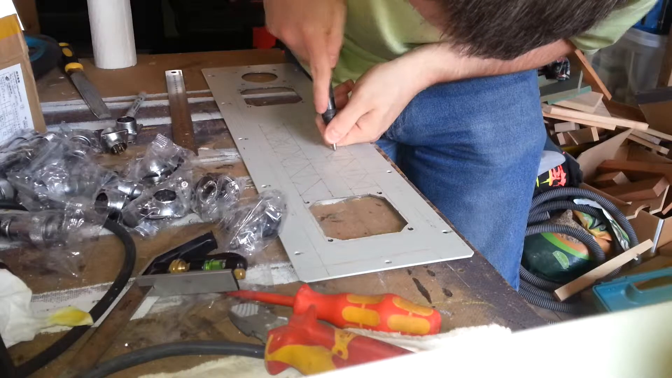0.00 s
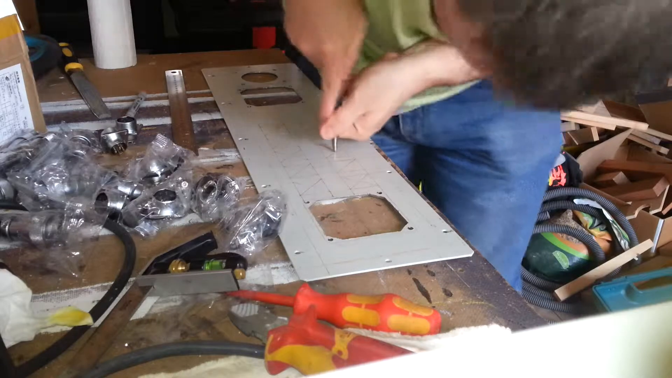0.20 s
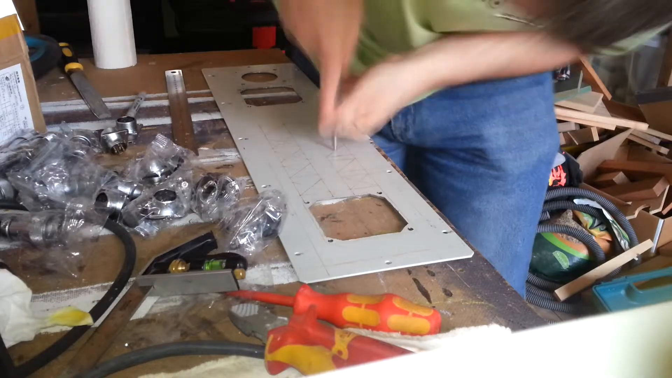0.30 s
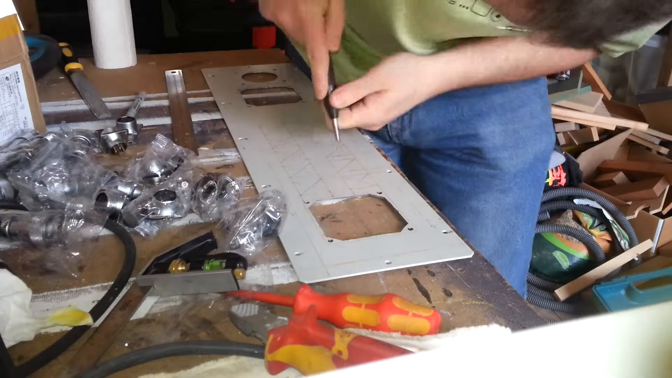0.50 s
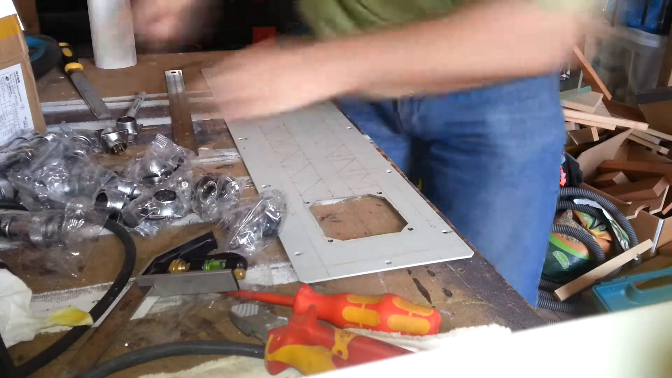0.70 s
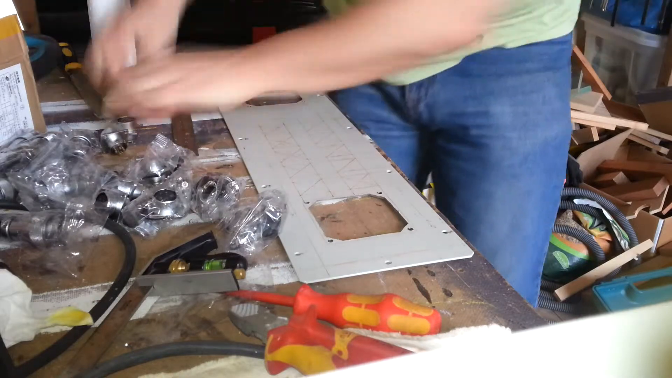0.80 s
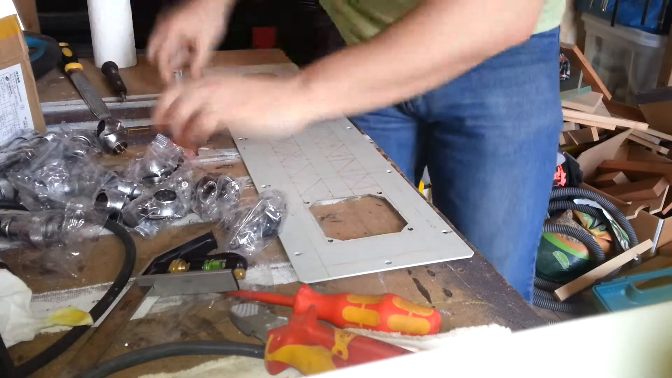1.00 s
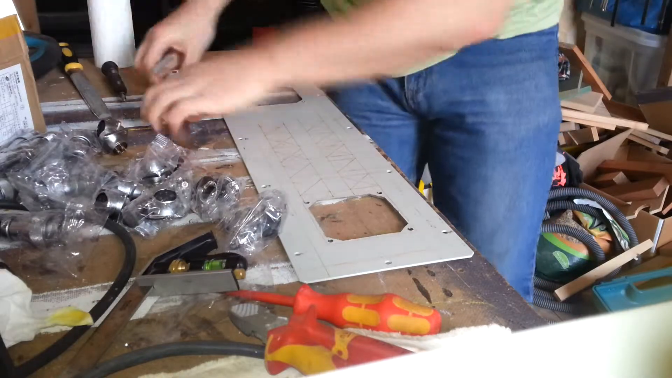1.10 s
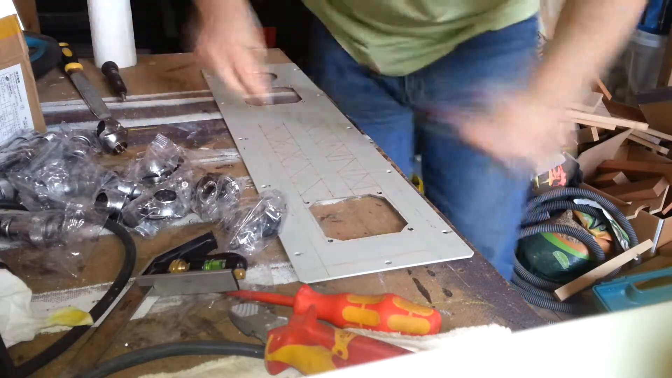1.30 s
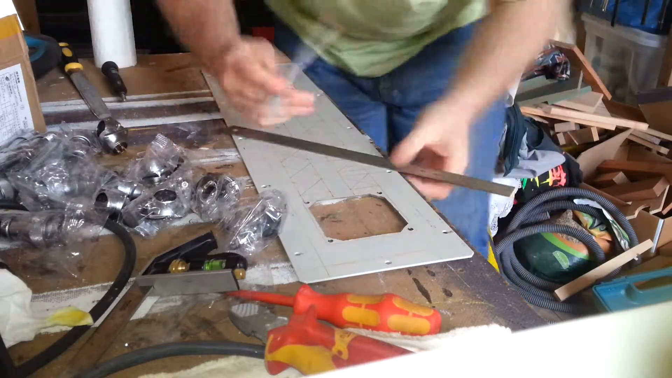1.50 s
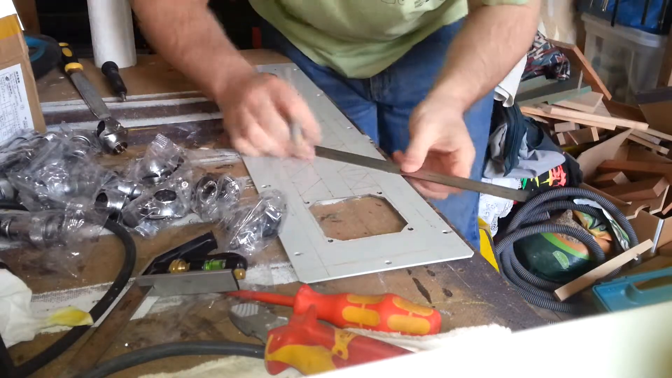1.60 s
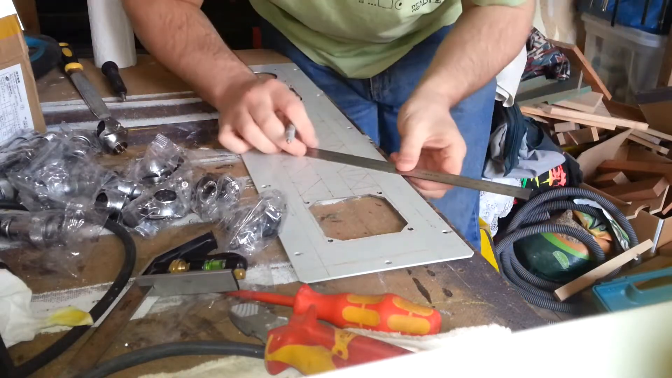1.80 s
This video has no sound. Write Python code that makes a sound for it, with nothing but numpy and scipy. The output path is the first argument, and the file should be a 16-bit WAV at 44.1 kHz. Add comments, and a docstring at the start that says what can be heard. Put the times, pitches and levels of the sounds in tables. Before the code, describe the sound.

A centre punch snaps onto a sheet-metal panel: a fast cluster of ticks from 0.18 s peaks at 0.25 s in a bright, short-ringing crack with a wooden bench thud, rattling again at 0.34. After near quiet, a tool clicks down at 0.78. Soft knocks and scuffs run from 0.85 to 1.36; a steel rule clacks at 1.4. Faint sleeve brushing and tiny shifts follow, over quiet room hum and hiss.

```python
"""Workshop bench: a spring punch snaps onto a sheet-metal panel, tools are set down, a steel rule is laid on.
Panel and bench contacts are clusters of tiny impacts, swelling and dying, that ring modes or broad resonances.
Small steel parts ping and tick from noise bursts; a few panel modes ring on as plain sines.
Behind: hands and sleeves brushing the bench, quiet room hum and hiss.
Mostly filtered noise and tiny impulses, with a few plain sine rings, in stereo."""
import sys
import numpy as np
from scipy import signal
from scipy.fft import rfft, irfft
from scipy.io import wavfile
from scipy.ndimage import uniform_filter1d

SR = 44100
rng = np.random.default_rng(int(sys.argv[2]) if len(sys.argv) > 2 else 0)


def to_wav(s):
    """Save 16-bit WAV."""
    ch = np.atleast_2d(s).T  # columns
    pcm = np.round(np.clip(ch, -1, 1) * 32767)  # PCM
    wavfile.write(sys.argv[1], SR, pcm.astype(np.int16))


def linear_from_db(decibels):
    """Turn decibels (scalar or array-like) into linear amplitude factors; 0 gives 1."""
    return 10 ** (np.asarray(decibels, float) / 20)


N = 83790

# panel clatters: [start t/s, rise/s, fall t60/s before FALL_SHARES, low modes level/dB, bright modes level/dB,
# treble crack level/dB, bright ring centre f/Hz]
CLATTERS = [(0.187, 0.014, 0.12, -33.5, -35, -46.5, 3630), (0.218, 0.0023, 0.26, -26, -38, -39.5, 4040),
            (0.233, 0.0068, 0.22, -63, -38, -43.5, 3530), (0.252, 0.0077, 0.045, -24.5, -16.5, -19, 4560),
            (0.263, 0.013, 0.11, -28.5, -17.5, -23.5, 3600),
            (0.331, 0.0074, 0.063, -38.5, -36.5, -38.5, 3770), (0.343, 0.0038, 0.07, -43, -39, -36, 4040),
            (0.75, 0.0066, 0.19, -52, -51, -58, 3320), (0.771, 0.003, 0.095, -35.5, -36, -51, 3900),
            (0.783, 0.001, 0.12, -24.5, -32.5, -32.5, 4050), (0.847, 0.0021, 0.18, -43, -49, -49, 3200),
            (1.022, 0.02, 0.18, -35.5, -40, -48.5, 3300), (1.103, 0.018, 0.79, -54, -56, -59, 3430),
            (1.173, 0.023, 0.2, -36.5, -49, -60, 3170), (1.231, 0.014, 0.17, -52, -57, -58.5, 3300),
            (1.3, 0.021, 0.069, -50.5, -54, -65, 3240), (1.361, 0.015, 0.12, -54, -51, -61.5, 3430),
            (1.392, 0.0016, 0.079, -37.5, -30, -31, 4300), (1.4, 0.016, 0.086, -32, -30.5, -28.5, 3426),
            (1.442, 0.0088, 0.12, -47, -57.5, -72, 3600)]
# factors on the clatter t60: [low modes, bright modes, crack, crack top]
FALL_SHARES = [0.86, 1.03, 1.035, 0.54]
# panel modes before each contact's chance: [f/Hz, relative level/dB]
PANEL_LOW_MODES = [(729, 0.5), (901, -7), (1044, 1.5), (1190, 8), (1320, -5.5), (1851, -6.5), (2190, -20.5),
                   (2463, -2)]
PANEL_BRIGHT_MODES = [(2900, -3), (3320, 0), (3500, -1), (3634, 0), (3892, -1), (4225, 0), (4640, -3),
                      (5270, -6), (5800, -8)]
# treble crack spectrum: [f/Hz, relative density/dB per Hz]
CRACK_SPECTRUM = [(2940, -13), (5000, -3.5), (5470, -6.5), (7690, -7.5), (12200, -11), (14800, -18.5),
                  (15300, -33), (15500, -65)]
# rule shifting on the panel: [start t/s, rise/s, fall t60/s, level/dB]
RULE_SHIFTS = [(.685, 0.0094, 0.089, -66), (0.934, .015, 0.06, -62.5), (1.579, 0.034, 0.12, -59),
               (1.716, 0.0067, 0.087, -62), (1.788, 0.0059, 0.056, -57), (1.845, 0.0087, 0.066, -64.5)]
# rule modes: [f/Hz, relative level/dB]
RULE_MODES = [(3000, -6), (3450, 0), (3930, -2)]
# clear rings of single modes: [start t/s, rise/s, hold/s, fall t60/s, peak level/dB, f/Hz]
MODE_RINGS = [(.277, .01, .032, .04, -25.5, 915), (1.398, .012, .006, .09, -29.5, 3634),
              (1.41, .01, .035, .06, -47, 721), (1.45, .01, .025, .05, -50, 900)]


def panel():
    """Impact clusters ring low and bright sheet modes and crack in the treble; the rule rings its own modes."""
    low_t60_s, bright_t60_s, rule_t60_s = 0.03, 0.03, 0.035
    crack_top_hz, bright_q = 9500, 1.3
    low_share, bright_share, *crack_shares = FALL_SHARES
    # broad noise between the modes
    low_wash = linear_from_db(2) * unit(band(1573, 0.67) ** 3)
    bright_wash = linear_from_db(3) * unit(band(3450, 1.4) ** 3)
    low_drive, bright_drive = rattle(), rattle()

    out = 0
    for start, rise, t60, low_db, bright_db, _, hz in CLATTERS:
        low = modes(touched(PANEL_LOW_MODES), low_t60_s) + low_wash
        bright = modes(touched(PANEL_BRIGHT_MODES), bright_t60_s) + bright_wash
        bright = bright * band(hz, bright_q)
        out = out + strike(low, low_drive, swell(start, rise, t60 * low_share, low_db))
        out = out + strike(bright, bright_drive, swell(start, rise, t60 * bright_share, bright_db))

    crack = unit(linear_from_db(curve([(2500, -44)] + list(CRACK_SPECTRUM))))
    top = 1 / (1 + (crack_top_hz / hz_axis()) ** 4)
    for body, share in zip([crack * (1 - top), crack * top], crack_shares):
        env = sum(swell(start, rise, t60 * share, crack_db)
                  for start, rise, t60, _, _, crack_db, _ in CLATTERS)
        out = out + body * rfft(low_drive * env)

    rule_body = unit(modes(RULE_MODES, rule_t60_s) + 0.5 * bright_wash)
    rule_env = sum(swell(*row) for row in RULE_SHIFTS)
    out = out + rule_body * rfft(rng.standard_normal((2, N)) * rule_env)

    t = np.arange(N) / SR
    rings = sum(swell(start, rise, t60, db, hold) * np.sin(2 * np.pi * hz * t)
                for start, rise, hold, t60, db, hz in MODE_RINGS)
    return out + rfft(rings) * np.array([[1], [0]])  # direct sound only


# knocks: [start t/s, rise/s, fall t60/s, level/dB, pitch f/Hz, table thud re pitch resonance level/dB]
KNOCKS = [(0.026, 0.022, 0.096, -55, 950, -10), (0.175, 0.046, 0.16, -26.5, 331, 0),
          (0.222, 0.042, 0.098, -26, 380, -9), (0.258, 0.01, 0.14, -19, 690, -18),
          (0.261, 0.0058, 0.23, -31.5, 380, -5.5), (0.332, 0.02, 0.06, -35.5, 405, -1.5),
          (0.754, 0.0474, 0.045, -30.5, 406, -1.5), (0.778, 0.0054, 0.13, -26, 441.4, -11),
          (0.837, 0.03, 0.11, -39, 600, -5.5), (.884, 0.015, 0.069, -40.5, 447, -7.5),
          (1.029, 0.016, 0.067, -30, 1380, -30), (1.034, 0.0017, 0.15, -39, 382, -28),
          (1.06, 0.022, 0.33, -45.5, 976, -15.5), (1.103, 0.017, 0.53, -40, 482, -7.5),
          (1.172, 0.018, 0.078, -33, 550, -5), (1.189, 0.01, 0.076, -27, 676, -9.5),
          (1.234, 0.036, 0.037, -40.5, 990, -36), (1.237, 0.014, 0.11, -42, 526, -41),
          (1.3, 0.02, 0.09, -42.5, 570, -31), (1.356, 0.016, 0.2, -38, 600, -10),
          (1.401, 0.018, 0.17, -63, 1174, -11.5), (1.399, 0.012, 0.25, -42.5, 334, -5)]
# bench thump under the snap: [start t/s, rise/s, fall t60/s, level/dB, f/Hz]
THUMP = (.25, .02, .13, -41, 45)


def bench():
    """Each knock rings a broad wooden resonance at its pitch, an overtone and the table's thud."""
    thud_hz, overtone_ratio, overtone_db = 168, 1.817, -13.5
    drive, out = rattle(), 0
    for start, rise, t60, db, hz, thud_db in KNOCKS:
        wood = band(hz, 1.234) ** 2
        overtone = linear_from_db(overtone_db) * band(overtone_ratio * hz, 0.7) ** 3
        thud = linear_from_db(thud_db) * band(thud_hz, 2.6) ** 2
        out = out + strike(wood + overtone + thud, drive, swell(start, rise, t60, db, power=0.71))
    *thump_env, thump_hz = THUMP
    return out + strike(band(thump_hz, 0.58) ** 2, drive, swell(*thump_env))


# pings of small steel parts: [start t/s, level/dB, f/Hz]
PINGS = [(.036, -48, 302), (.582, -51.5, 970), (.781, -27, 3990), (0.846, -52.5, 14000), (.849, -59, 9000),
         (1.034, -43.5, 10540)]
# single sharp contacts: [start t/s, level/dB, centre f/Hz]
TICKS = [(0.187, -36, 4270), (0.2032, -27, 4070), (0.2194, -25.5, 4500), (0.2335, -16.5, 830),
         (0.238, -29, 5960), (0.255, -22.5, 4260), (.331, -40.5, 8000), (0.345, -26.5, 4490),
         (.782, -17, 4450), (0.7931, -27, 3070), (0.888, -27, 458), (1.021, -39.5, 2500),
         (1.037, -27, 1560), (1.2, -33, 910), (1.395, -26, 4870), (1.409, -19, 4350)]


def punch():
    """Noise bursts ring narrow modes as pings of small steel parts, broad bands as sharp contact ticks."""
    ping_t60_s, ping_rise_s, ping_drive_t60_s = 0.012, 0.0033, 0.098
    tick_t60_s, tick_q = 0.014, 1.0
    drive, out = rng.standard_normal((2, N)), 0
    for start, db, hz in PINGS:
        out = out + strike(modes([(hz, 0)], ping_t60_s), drive, swell(start, ping_rise_s, ping_drive_t60_s, db))
    for start, db, hz in TICKS:
        out = out + strike(band(hz, tick_q) ** 3, drive, swell(start, 0, tick_t60_s, db))
    return out


# hands and sleeves on the bench, before the random wander: [t/s, level/dB]
RUSTLE_LEVEL = [(0, -68), (.15, -63.5), (0.452, -67), (.95, -62.5), (1.501, -68), (1.601, -58.5),
                (1.799, -60), (1.9, -66)]


def rustle():
    """Brushing: noise through one broad low-mid resonance, its level wandering unevenly."""
    db = np.interp(np.arange(N) / SR, *np.array(RUSTLE_LEVEL).T) + 3 * walk(size=900)
    return unit(band(600, 0.46) ** 2) * rfft(rng.standard_normal((2, N)) * linear_from_db(db))


# hiss spectrum: [f/Hz, relative density/dB per Hz]
HISS_SPECTRUM = [(15, -54), (25, -23.5), (164, -4), (378, -5.5), (410, -23), (598, -17), (1270, -20.5),
                 (1490, -33.5), (1850, -24.5), (2230, -27), (5280, -30), (12500, -28), (14300, -26),
                 (15500, -66)]
# hiss width: [f/Hz, side re mid level/dB]
HISS_SIDE = [(60, -4), (380, -8), (700, -9.5), (1290, 1.5), (2380, 0), (4400, -1.5), (8120, -2.5),
             (15000, -0.5)]


def hiss():
    """Room hum and microphone hiss: shaped mid and side noise, swelling a little together; left and right."""
    level_db = -62.5
    noise = rng.standard_normal((2, N)) * linear_from_db(2.0 * walk(size=1400))
    mid, side = linear_from_db(level_db) * unit(linear_from_db(curve(HISS_SPECTRUM))) * rfft(noise)
    side = side * linear_from_db(curve(HISS_SIDE))
    return np.array([mid + side, mid - side])


def rattle():
    """Two unrelated streams of tiny uneven impacts over smooth rubbing noise, about rms 1."""
    impacts_per_s, scatter_db, smooth_share = 3000, 3, 0.58
    hit = rng.random((2, N)) < impacts_per_s / SR
    hit = hit * linear_from_db(scatter_db * rng.exponential(size=(2, N)))
    hit = hit * rng.choice([-1, 1], (2, N))
    rubbing = rng.standard_normal((2, N))
    return np.sqrt(1 - smooth_share) * hit / hit.std() + np.sqrt(smooth_share) * rubbing


def strike(body, drive, env):
    """One event through its body, carrying just the energy of its envelope."""
    out = body * rfft(drive * env)
    energy = np.sum(np.abs(out) ** 2, axis=1, keepdims=True)
    return out * np.sqrt(np.sum(env ** 2) * N / 2 / energy)


def touched(table):
    """Modes as one contact point finds them: levels and pitches shifted by chance."""
    level_sd_db, detune_sd = 3, 0.025
    chance = rng.standard_normal((len(table), 2))
    return [(hz * (1 + detune_sd * a), db + level_sd_db * b) for (hz, db), (a, b) in zip(table, chance)]


def modes(table, t60_s):
    """Sum of ringing modes of alternating sign, steepened outside their range."""
    ring = 0
    for k, (hz, db) in enumerate(table):
        q = np.pi * hz * t60_s / np.log(1000)
        ring = ring + (-1) ** k * linear_from_db(db) * band(hz, q)
    centre_hz = np.sqrt(table[0][0] * table[-1][0])
    return unit(ring * band(centre_hz, 0.34) ** 2)


def swell(start, rise, t60, db, hold=0, power=0.5):
    """Quick power-law rise, hold, exponential fall."""
    t = np.arange(N) / SR - start
    rise = max(rise, 1 / SR)
    fall_db = 60 * np.clip(t - rise - hold, 0, None) / t60
    return linear_from_db(db - fall_db) * np.clip(t / rise, 0, 1) ** power


def walk(size):
    """Slow chance: random levels held and slewed over size samples."""
    held = np.repeat(rng.standard_normal(N // size + 1), size)
    return uniform_filter1d(held, size=size)[:N]


def hz_axis():
    """Bin frequencies of a whole-length transform, floored at 1 Hz."""
    return np.maximum(np.arange(N // 2 + 1) * SR / N, 1)


def curve(table):
    """(Hz, value) points joined on a log-frequency axis."""
    hz, value = np.array(table).T
    return np.interp(np.log(hz_axis()), np.log(hz), value)


def band(hz, q):
    """Two-pole resonance, gain 1 at its centre."""
    r = hz_axis() / hz
    return 1 / (1 + 1j * q * (r - 1 / r))


def unit(h):
    """Response scaled so that white noise of rms 1 comes out at rms 1."""
    return h / np.sqrt(np.mean(np.abs(h) ** 2))


# port phase: [f/Hz, left lead/rad]
PORT_PHASE = [(200, 0), (500, -.6), (1460, -1.1), (2410, -.3), (6800, .3), (8100, -3.2), (10100, -7),
              (12000, -10), (15500, -12)]
# port balance: [f/Hz, left re right level/dB]
PORT_BALANCE = [(60, 6), (110, -1), (380, -1), (700, 0.5), (1290, 2.5), (2380, -1), (4400, 0.5),
                (8120, 2.5), (15000, 7)]
# gain of the sound of opposite sign at the two ports: [f/Hz, level/dB]
DIFFUSE_GAIN = [(60, -14.5), (300, -14.5), (700, -6), (3000, -2.5), (12000, -1.5)]


def scene():
    """Direct sound reaches two ports with a phase and level step; diffuse sound has opposite sign at them."""
    direct, diffuse = panel() + bench() + punch() + rustle()
    diffuse = diffuse * linear_from_db(curve(DIFFUSE_GAIN))
    port = linear_from_db(curve(PORT_BALANCE) / 2) * np.exp(0.5j * curve(PORT_PHASE))
    left_right = np.array([(direct + diffuse) * port, (direct - diffuse) / port])
    return irfft(left_right + hiss(), N)


def low_pass(x):
    """Removes everything above the highest recorded frequency."""
    return signal.sosfilt(signal.butter(12, 15950, fs=SR, output="sos"), x)


def record(dry):
    """A steep elliptic low-pass cuts the top."""
    top_hz, ripple_db, stop_db = 14700, 0.2, 25
    lowpass = signal.ellip(8, ripple_db, stop_db, top_hz, fs=SR, output="sos")
    mix = signal.sosfilt(lowpass, dry)
    return low_pass(mix)


dry = scene()
out = record(dry)
to_wav(out)
```